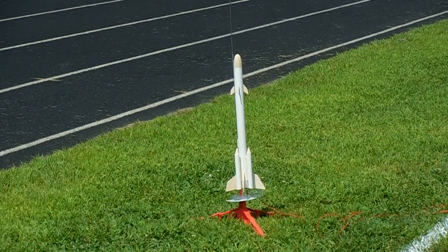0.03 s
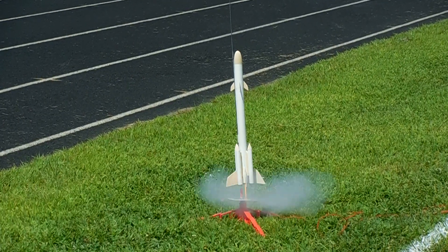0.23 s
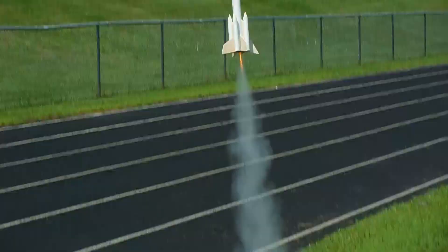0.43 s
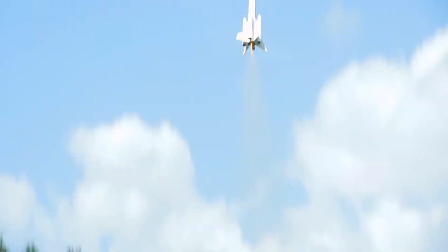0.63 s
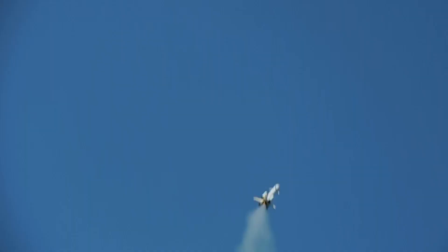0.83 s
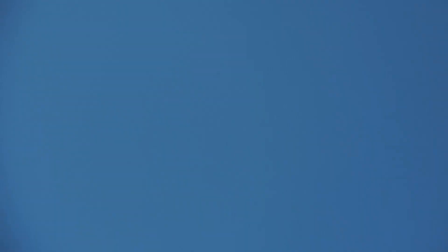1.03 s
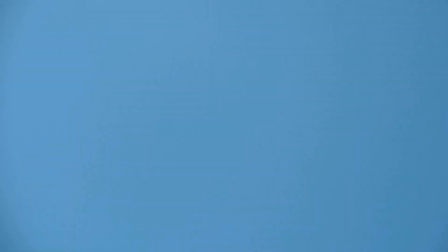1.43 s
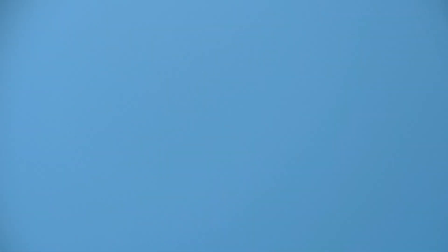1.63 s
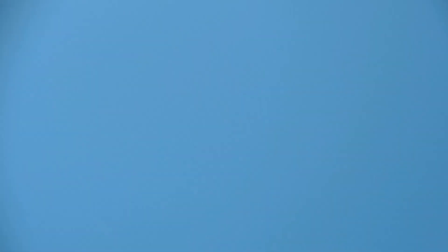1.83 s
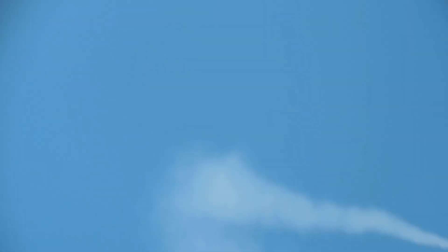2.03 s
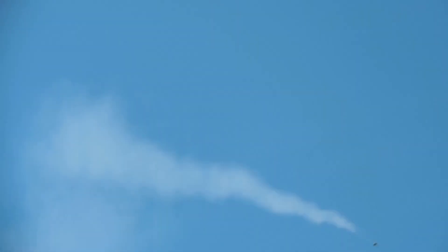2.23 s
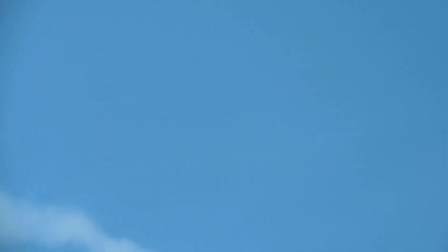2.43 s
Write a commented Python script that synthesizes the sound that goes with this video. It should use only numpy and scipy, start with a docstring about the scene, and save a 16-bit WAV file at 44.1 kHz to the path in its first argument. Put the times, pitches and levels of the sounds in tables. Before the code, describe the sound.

A model rocket launches with a pop and a loud, rough, hissing whoosh that fades away.

```python
"""Model rocket from a grass field

The igniter pops close by; the motor hisses up to full thrust, climbs away crackling and burns out.
Near the pad the jet, rich in ultrasound, overloads the microphone's sensitive left channel, turning hiss
into a rough roar; the much weaker right overloads only briefly. The field echoes after burnout."""
import sys
import numpy as np
from scipy import signal
from scipy.fft import rfft, irfft, next_fast_len
from scipy.io import wavfile
from scipy.ndimage import map_coordinates

SR = 44100
rng = np.random.default_rng(int(sys.argv[2]) if len(sys.argv) > 2 else 0)


def materialize(psi):
    """Save the field psi as 16-bit PCM at rate SR to the path in sys.argv[1].

    A 1-D psi becomes a single channel; in a 2-D psi each row is a channel.
    """
    bounded = np.clip(np.atleast_2d(psi).T, -1, 1)
    quanta = np.round(bounded * 32767).astype(np.int16)
    wavfile.write(sys.argv[1], SR, quanta)


N = 114660
FAST_SR, FAST_N = 2 * SR, 2 * N   # doubled rate, to hold the ultrasound
TIME = np.arange(FAST_N) / FAST_SR


def from_db(db):
    return 10 ** (np.asarray(db) / 20)


def unit_rms(x):
    return x / np.sqrt(np.mean(x ** 2) + 1e-20)


def at_hz(points, hz):
    """Read a spectrum on a log-frequency axis."""
    freqs, values = np.transpose(points)
    return np.interp(np.log(hz + 1e-9), np.log(freqs), values)


def in_time(rows):
    """Read each column of a curve at every sample."""
    times, *columns = np.transpose(rows)
    return [np.interp(TIME, times, column) for column in columns]


def coloured(x, points):
    """Equalise a sound along a curve."""
    size = next_fast_len(FAST_N + 4096)
    gain = from_db(at_hz(points, np.fft.rfftfreq(size, 1 / FAST_SR)))
    return irfft(rfft(x, size) * gain, size)[..., :FAST_N]


def band(x, low_hz, high_hz, order=2):
    """Butterworth band-pass."""
    sos = signal.butter(order, [low_hz, high_hz], "band", fs=FAST_SR, output="sos")
    return signal.sosfilt(sos, x + 1e-18)


def resonant(x, rows):
    """Peaking filters in series."""
    for hz, width_hz, db in rows:
        gain = from_db(db / 2)
        width = np.tan(np.pi * width_hz / FAST_SR)
        tuning = -2 * np.cos(2 * np.pi * hz / FAST_SR)
        x = signal.lfilter([1 + width * gain, tuning, 1 - width * gain],
                           [1 + width / gain, tuning, 1 - width / gain], x + 1e-18)
    return x


def drift(rate_hz):
    """Smooth random wander with a spread of 1."""
    hop = 80
    pole = np.exp(-2 * np.pi * hop * rate_hz / FAST_SR)
    noise = rng.standard_normal(FAST_N // hop + 502)
    slow = signal.lfilter([1], [1, -2 * pole, pole * pole], noise)[500:]
    return np.interp(np.arange(FAST_N) / hop, np.arange(len(slow)), unit_rms(slow))


def delayed(x, lag_s):
    """Shift a sound in time, between samples."""
    return map_coordinates(x, [(TIME - lag_s) * FAST_SR], order=3)


def pops(rows, low_hz, high_hz, order):
    """Short pressure pulses at given times and peak levels."""
    clicks = np.zeros(FAST_N)
    for start_s, peak_db in rows:
        clicks[int(start_s * FAST_SR)] = from_db(peak_db)
    unit_peak = np.abs(band(signal.unit_impulse(1024), low_hz, high_hz, order)).max()
    return band(clicks, low_hz, high_hz, order) / unit_peak


# Open air over the field: freq_hz, gain_db
AIR_COLOUR = [(30, -6), (90, 4), (170, 5), (260, -5.5), (600, -1), (1000, 0.5), (1500, -5), (3000, -7),
              (6000, -17), (10000, -19), (16000, -25)]
# Its level at the microphone: left_db, right_db
AIR_DB = [-50, -57]


def outdoor_air():
    """A faint, steady outdoor rush, separate on each side."""
    air = coloured(rng.standard_normal((2, FAST_N)), AIR_COLOUR)
    return from_db(AIR_DB)[:, None] * unit_rms(air)


# Echo of field and trees, against the jet: freq_hz, level_db
FIELD_LEVEL = [(300, -17), (1000, -14.5), (3000, -10), (8000, -11.5), (14000, -8.5)]
# Its decay: freq_hz, t60_s
FIELD_T60 = [(300, 2.9), (3000, 1.85), (8000, 1.13), (14000, 0.6)]
# Scatter near the microphone, against the jet: freq_hz, level_db
NEAR_SCATTER = [(500, -35), (1500, -1), (4000, -16), (12000, -9.5)]


def field_echo(jet_gain, hz):
    """Envelope of one band's diffuse sound: the field rings on, nearby scatter follows at once."""
    decay = np.exp(-2 * np.log(1000) / (at_hz(FIELD_T60, hz) * FAST_SR))
    sent = jet_gain * from_db(at_hz(FIELD_LEVEL, hz))
    echo_power = signal.lfilter([1 - decay], [1, -decay], sent ** 2)
    scatter = jet_gain * from_db(at_hz(NEAR_SCATTER, hz))
    return np.sqrt(echo_power + scatter ** 2)


# Bounce off the ground, latest with the rocket overhead: time_s, lag_ms
GROUND_LAG = [(0.3, 0.5), (0.6, 4.5), (0.95, 6.8), (1.17, 7.64), (1.35, 7.75), (1.55, 7.68), (1.75, 7.51),
              (1.95, 7.28), (2.17, 6.95), (2.33, 6.84)]
# What the grass reflects: freq_hz, gain_db
GRASS_COLOUR = [(300, -1.5), (1000, -4), (3000, -11), (7000, -16), (14000, -26)]


def ground_echo(x):
    """The bounce off the grass combs the spectrum, gliding with the flight; a steady one is close by."""
    lag_ms, = in_time(GROUND_LAG)
    dull = coloured(x, GRASS_COLOUR)
    return delayed(dull, lag_ms / 1000) + from_db(-7) * delayed(dull, lag_s=0.0024)


# Colour of the pad's blast plate: centre_hz, width_hz, gain_db
PLATE_COLOUR = [(1590, 680, -9.5), (3130, 450, 6.5), (4450, 400, -2.5), (5200, 330, 0.5), (6500, 1000, -6),
                (7550, 580, 2), (12700, 1500, 1)]


def blast_plate(x):
    """The flame strikes the plate, whose colour fades as the rocket lifts away."""
    liftoff_s, fade_s = 0.354, 0.04
    on_pad = np.clip(0.5 + (liftoff_s - TIME) / fade_s, 0, 1)
    return on_pad * resonant(x, PLATE_COLOUR) + (1 - on_pad) * x


def igniter():
    """A sharp snap with a little body from the pad, just before the flame."""
    start_s = 0.0822
    snap = pops([(start_s, -13)], low_hz=1910, high_hz=3930, order=4)
    body = pops([(start_s, -15.5)], low_hz=400, high_hz=3000, order=1)
    return snap - body


# Single sputters, high over the field: start_s, peak_db
SPUTTERS = [(1.506, -7), (1.558, -6.5), (1.598, -21), (2.2235, -26), (2.2455, -6.5), (2.252, -13),
            (2.317, -22)]


def sputters():
    """The propellant spits late in the burn."""
    return pops(SPUTTERS, low_hz=560, high_hz=2630, order=2)


def turbulence():
    """Two mixing noises that share a crackle of small, uneven shocks."""
    shocks_per_s, spread_db, crackle_db = 1100, 3.5, -12
    sizes = from_db(spread_db * np.minimum(rng.exponential(1, FAST_N), 5))
    shocks = unit_rms(sizes * (rng.random(FAST_N) < shocks_per_s / FAST_SR))
    return [unit_rms(rng.standard_normal(FAST_N) + from_db(crackle_db) * shocks) for _ in range(2)]


# The jet heard from the ground, treble relative to its hiss: time_s, hiss_db, treble_db
JET_FLIGHT = [(0.095, -37.5, 2.5), (0.13, -34, 3), (0.2, -27, 2.5), (0.27, -13, -3), (0.305, -9, -0.5),
              (0.34, -2.6, 2.1), (0.375, 3.5, -2.6), (0.41, 14, -5), (0.5, -2, -1.9), (0.6, -2.2, 3),
              (0.69, 4, 0.9), (0.85, -0.5, -2.5), (0.97, -2.5, -6), (1.09, -4.8, -10.5), (1.2, -9.5, -7),
              (1.48, -10, -8.5), (1.53, -11.5, -10.5), (1.57, -11.7, -11.5), (1.65, -14.5, -11),
              (1.8, -16.5, -11.5), (2.15, -18, -13.5), (2.33, -17.5, -14.5)]
# The jet at close range: freq_hz, gain_db
JET_COLOUR = [(60, -25), (200, -34), (400, -20.5), (700, -13.5), (1100, -5.5), (1600, -4), (2400, -0.5),
              (3700, -.5), (5200, 1.5), (7500, -0.5), (12000, 3), (16000, -0.5), (24000, 2), (40000, -0.5)]
# Each band's part in the treble change: freq_hz, share
TREBLE_SHARE = [(2500, 0), (5000, 0.36), (8000, 0.6052), (12500, 1.35), (20000, 1), (40000, 2)]
# The lows, thin until motor pressure builds: time_s, gain_db
JET_LOWS = [(.09, -5), (.19, -5), (.28, 0.5), (.41, -3.5), (.6, 1.5), (1.0, -1), (1.4, -2), (1.58, -1),
            (1.9, -1.5), (2.3, -2.5)]
# Each band's part in that change: freq_hz, share
LOWS_SHARE = [(1500, 1), (2200, 0.29), (3500, 0)]


def jet():
    """The exhaust in half-octave bands, duller with distance: direct sound and diffuse stereo echo."""
    light_s, attack_s = 0.0868, 0.00079
    burnout_s, fall_db_per_s = 2.3595, 450
    trim_db, flutter_db, band_flicker_db = 0.55, 0.46, 0.99
    hiss_db, treble_db = in_time(JET_FLIGHT)
    lows_db, = in_time(JET_LOWS)
    level_db = hiss_db + trim_db + flutter_db * drift(rate_hz=210)
    level_db -= fall_db_per_s * np.maximum(TIME - burnout_s, 0)
    lit = np.clip((TIME - light_s) / attack_s, 0, 1)
    edges_hz = 56 * 2 ** np.arange(0, 9.6, 0.5)
    hiss_scale = np.sqrt(FAST_SR / 2 / 4500)   # unit noise power across 1.5-6 kHz
    exhaust = turbulence()
    echo_noise = rng.standard_normal((2, 2, FAST_N))
    direct, diffuse = 0, 0
    for k, (low, high) in enumerate(zip(edges_hz, edges_hz[1:])):
        hz = np.sqrt(low * high)
        tilt_db = treble_db * at_hz(TREBLE_SHARE, hz) + lows_db * at_hz(LOWS_SHARE, hz)
        flicker_db = band_flicker_db * drift(rate_hz=20.7)
        gain = hiss_scale * lit * from_db(level_db + at_hz(JET_COLOUR, hz) + tilt_db + flicker_db)
        direct += gain * band(exhaust[k % 2], low, high)   # neighbouring bands alternate noises
        diffuse += field_echo(gain, hz) * band(echo_noise[k % 2], low, high)
    return direct, diffuse


# Left channel after the overload: freq_hz, gain_db
LEFT_COLOUR = [(30, -21.5), (90, -14.5), (220, -6), (600, -0.73), (2500, -1), (5200, -1.5), (8000, -3.76),
               (11000, -8), (15500, -15)]
# Right channel, likewise: freq_hz, gain_db
RIGHT_COLOUR = [(30, -15), (90, -21), (220, -5), (600, -4.5), (3200, 0), (6000, -3.5), (9000, -4),
                (15500, -7)]


def microphone(pressure):
    """Each input adds faint hiss, flattens the peaks, ultrasound included, and colours the sound."""
    left, right = pressure + from_db(-68) * rng.standard_normal((2, FAST_N))
    left = coloured(overload(left, ceiling=0.63, hardness=4.4), LEFT_COLOUR)
    right = coloured(overload(right, ceiling=0.48, hardness=10), RIGHT_COLOUR)
    return signal.resample_poly([left, right], 1, 2, axis=1)


def overload(x, ceiling, hardness):
    """An input rounds off peaks as they near its ceiling."""
    return x / (1 + np.abs(x / ceiling) ** hardness) ** (1 / hardness)


# Bumps and notches at the microphone position: centre_hz, width_hz, gain_db
POSITION_COLOUR = [(1114, 134, 2.5), (1330, 104, -4.5), (1630, 65, -3), (2488, 230, 0.5), (2900, 360, -2),
                   (5170, 820, 2)]


def scene():
    """The launch at two closely spaced microphone ports of very unequal sensitivity."""
    right_db, right_lead_s = -21, 0.63 / FAST_SR
    exhaust, diffuse = jet()
    rocket = blast_plate(exhaust) + sputters()
    arriving = resonant(rocket + ground_echo(rocket), POSITION_COLOUR) + igniter()
    left = arriving + diffuse[0]
    right = from_db(right_db) * (delayed(arriving, -right_lead_s) + diffuse[1])
    return microphone(np.array([left, right]) + outdoor_air())


def record(dry):
    """The recorder cuts steeply above 15.8 kHz."""
    return signal.sosfilt(signal.ellip(12, 0.1, 80, 15800, fs=SR, output="sos"), dry)


dry = scene()
out = record(dry)
materialize(out)
```